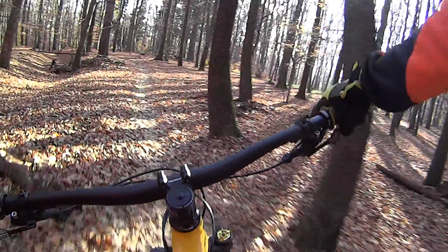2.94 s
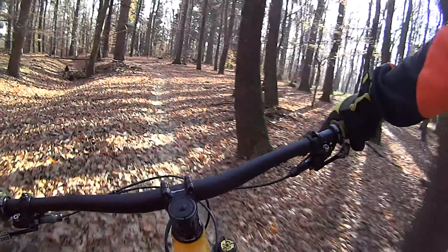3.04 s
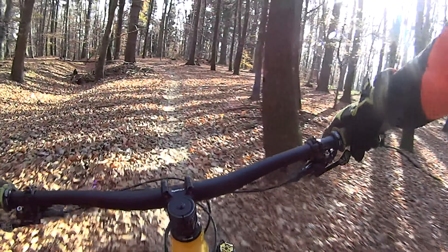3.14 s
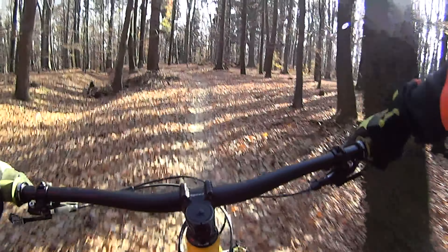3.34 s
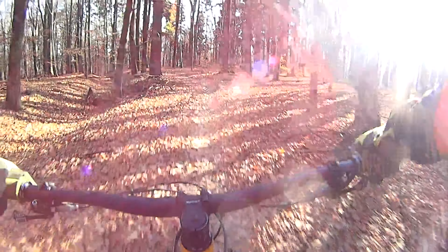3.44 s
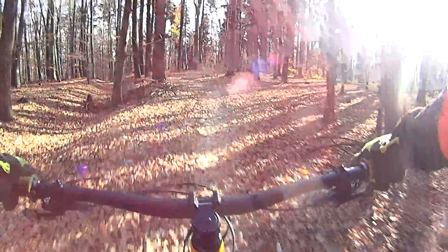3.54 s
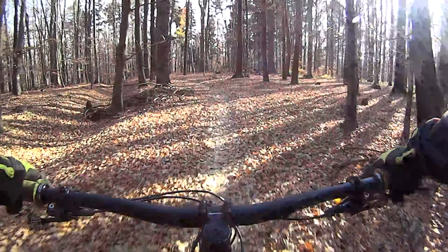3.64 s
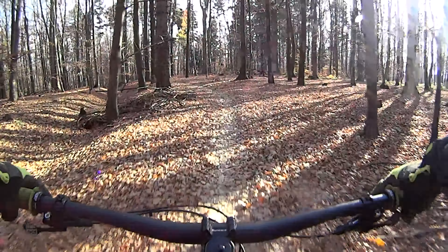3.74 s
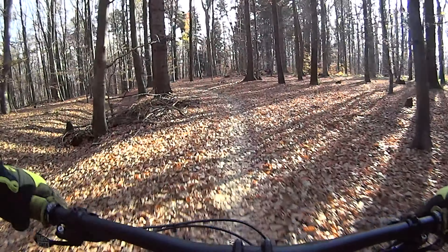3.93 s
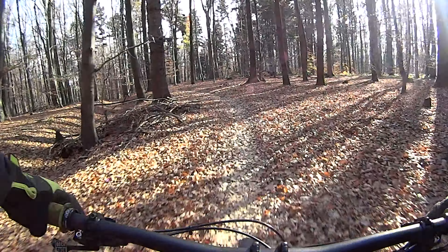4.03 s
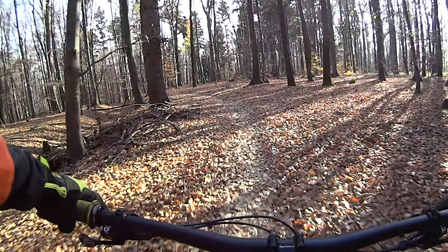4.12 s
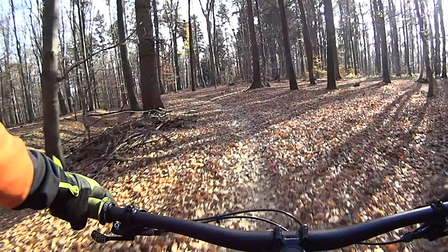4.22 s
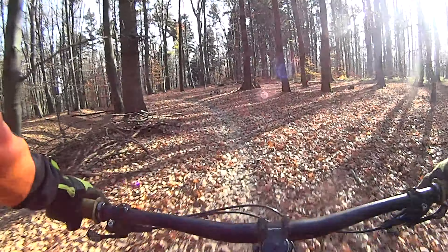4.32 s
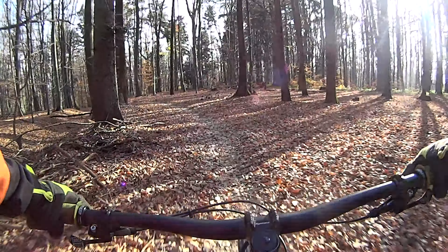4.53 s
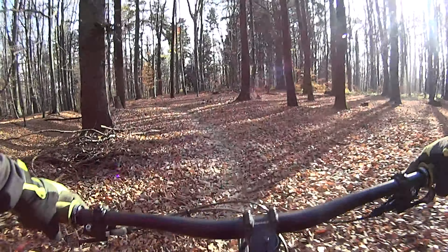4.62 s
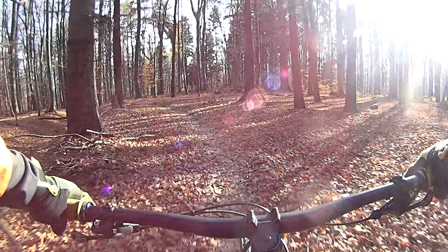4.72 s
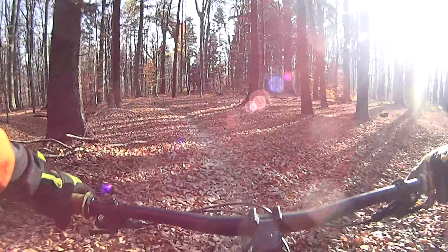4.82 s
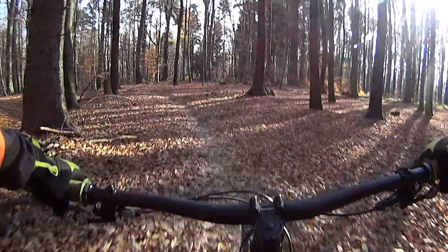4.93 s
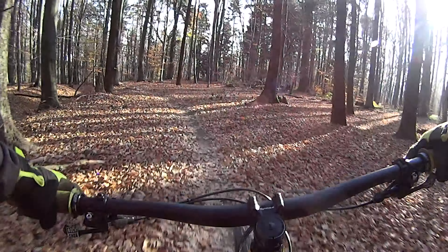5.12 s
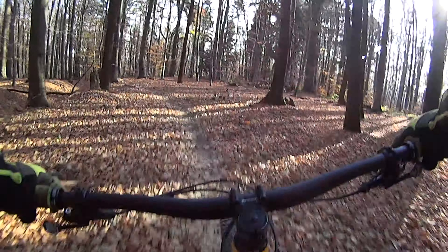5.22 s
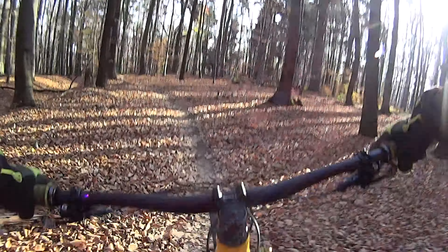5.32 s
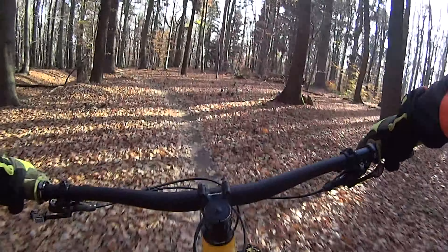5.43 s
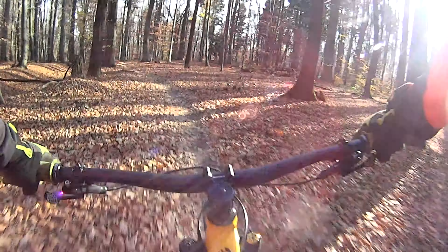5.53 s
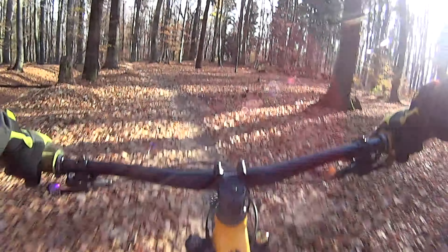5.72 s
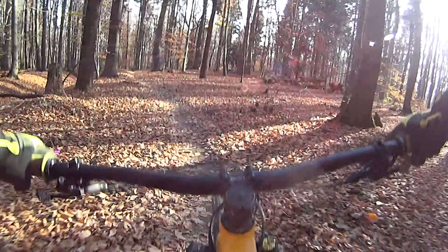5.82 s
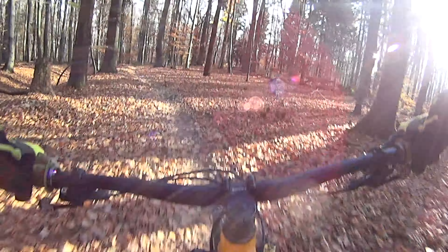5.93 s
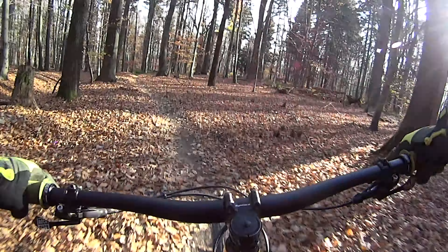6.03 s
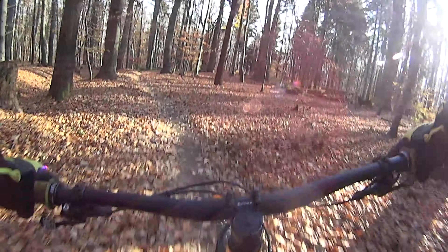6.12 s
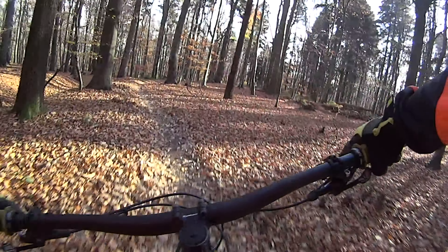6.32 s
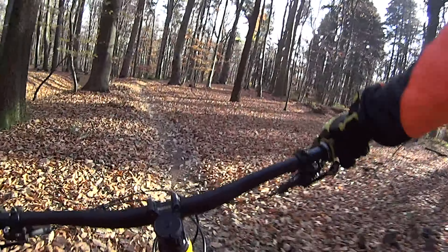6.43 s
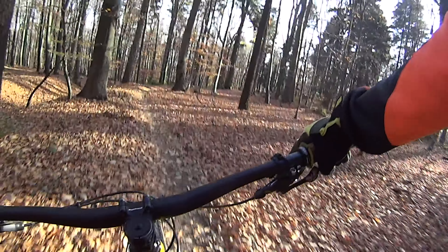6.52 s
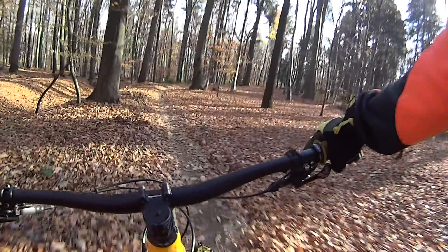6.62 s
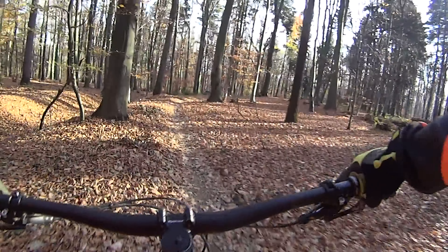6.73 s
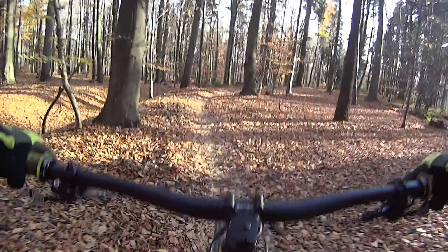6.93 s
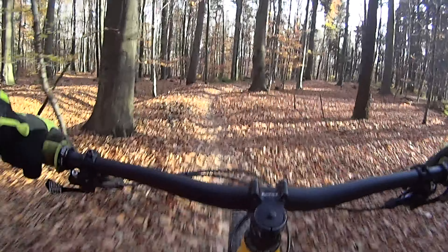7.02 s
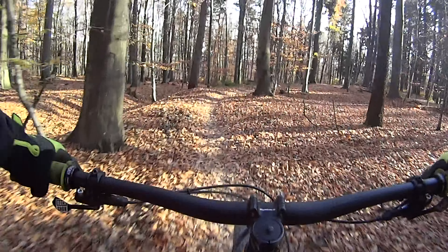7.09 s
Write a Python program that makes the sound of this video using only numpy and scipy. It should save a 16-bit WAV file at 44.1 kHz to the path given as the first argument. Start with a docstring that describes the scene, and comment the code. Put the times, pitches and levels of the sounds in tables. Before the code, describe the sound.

Close, crackling rustle of a bicycle rolling over dry leaves, dotted with twig snaps, rattles and thumps from bumps in the trail.

```python
"""Mountain bike in dry leaves

A forest trail, heard close up from a stereo camera on the rider's chest. The tyres crush leaves,
scrub over packed litter and snap twigs. Over roots the frame knocks, chain and cables rattle,
and the jolts thump through the camera mount. The ground gets rougher towards the end."""
import sys
import numpy as np
from scipy import signal
from scipy.fft import rfft, irfft
from scipy.io import wavfile
from scipy.ndimage import uniform_filter1d

SR = 44100
rng = np.random.default_rng(int(sys.argv[2]) if len(sys.argv) > 2 else 0)


def bounce(signal):
    """Save signal as a 16-bit WAV file at the path given by the first command-line argument."""
    frames = np.transpose(np.atleast_2d(signal))
    limited = np.clip(frames, -1, 1)
    pcm = np.round(limited * 32767).astype(np.int16)
    wavfile.write(sys.argv[1], SR, pcm)


N = 399546
TIME, BINS = np.arange(N) / SR, np.fft.rfftfreq(N, 1 / SR)

# roughness of the ground: t/s, tyre scrub level/dB, frame rumble level/dB
ROUGHNESS = [(0.0, -42, -52.5), (1.52, -41, -51.5), (2.5, -45, -57), (2.76, -39.5, -52.0),
             (3.12, -43.5, -54.0), (3.78, -40.5, -53.0), (3.92, -43.5, -53.5), (5.2, -41.5, -53.0),
             (5.44, -37.5, -46), (5.68, -38.5, -49.5), (6.38, -41, -53.5), (6.76, -36.5, -46.5),
             (7.24, -39.5, -52), (7.58, -40.0, -52.5), (7.72, -32, -42.5), (7.92, -33, -37.5),
             (8.33, -38.5, -54.5), (9.06, -32.5, -36.5)]
# spectrum of a breaking twig or stiff leaf: f/Hz, level/dB
SNAP_SPECTRUM = [(600, -27.5), (1900, -12), (2500, -4), (2900, -1.5), (3500, 3), (4100, -4.5), (5000, 3),
                 (5700, -7.5), (7500, -13.5), (11000, -28)]
# hard blows to the frame: t/s, level/dB, centre of the ring f/Hz
FRAME_BLOWS = [(0.358, -23, 1370), (0.631, -12.5, 1060), (0.985, -24, 1460), (1.695, -25, 1640),
               (2.703, -23.5, 1130), (3.753, -18.5, 1430), (5.369, -13, 1030), (5.55, -11, 1050),
               (5.861, -19, 1650), (6.048, -19.5, 1580), (6.503, -24.5, 990), (6.582, -22, 1470),
               (6.779, -15, 1450), (7.016, -22.5, 1390), (7.201, -23.5, 1390), (7.344, -26.5, 1500),
               (7.648, -15, 1350), (7.727, -11, 980), (7.735, -6.5, 1110), (7.765, -10.5, 1410),
               (7.788, -13.5, 1530), (8.153, -19.5, 1400), (8.592, -16.5, 1420), (8.906, -7, 990)]


def amp(db):
    """Decibels to gain."""
    return 10 ** (np.asarray(db) / 20)


def unit(x):
    """Scales to an rms of one."""
    return x / np.sqrt(np.mean(x ** 2) + 1e-20)


def over_hz(points):
    """Reads a curve at each bin, on a log-frequency axis."""
    hz, value = np.transpose(points)
    return np.interp(np.log(BINS + 1), np.log(hz + 1), value)


def over_time(rows):
    """Reads every column of a curve at each sample."""
    s, *columns = np.transpose(rows)
    return [np.interp(TIME, s, column) for column in columns]


def wander(lo_hz, hi_hz):
    """Random drift with equal power in each octave between two rates."""
    band = (BINS > lo_hz) * (BINS < hi_hz) / np.sqrt(BINS + lo_hz)
    return unit(irfft(rfft(rng.standard_normal(N)) * band, N))


def clicks(per_s, spread_db):
    """Three unrelated trains of tiny impacts, mostly small and a few large."""
    size = amp(spread_db * np.minimum(rng.exponential(1, (3, N)), 4.5))
    return unit(size * rng.choice([-1, 1], (3, N)) * (rng.random((3, N)) < per_s / SR))


def microphones(direct, scattered=None):
    """Direct sound reaches the two ports with a phase and level step; scattered sound differs at each."""
    # likeness of left and right: f/Hz, coherence/0-1
    likeness = [(60, .93), (160, .85), (330, 0.35), (520, 0.35), (700, 0.4), (1000, 0.6), (1400, 0.9),
                (1720, 0.9), (1900, 0.3), (2300, 0.95), (5100, 0.98), (5850, 0.65), (6450, 0.7),
                (7100, 0.45), (11000, 0.66)]
    # phase by which the left leads: f/Hz, phase/rad
    left_lead = [(210, 0), (310, 1.7), (420, 2.4), (600, 2.4), (820, .5), (1080, -.15), (1320, 0),
                 (2000, -1), (2500, -.55), (3080, -1.15), (3550, -.1), (5000, -.25), (8000, -.5),
                 (11000, -.15)]
    # left minus right: f/Hz, level/dB
    balance = [(100, -1), (500, 0), (850, -0.5), (1250, 4), (2000, 1), (2850, 3.5), (3250, -7), (3950, 5),
               (5800, 0.5), (6750, 2.5), (7200, 0.5), (11000, 0.5)]
    sides, lead = np.array([[0.5], [-0.5]]), over_hz(left_lead)
    coherence = np.clip(over_hz(likeness), 0, 1)
    pair = rfft(direct) * np.exp(1j * sides * lead)
    if scattered is not None:
        pair = np.sqrt(coherence) * pair + np.sqrt(1 - coherence) * rfft(scattered)
    mid_gain = np.sqrt(coherence * np.cos(lead / 2) ** 2 + (1 - coherence) / 2 + 1e-6)
    return irfft(pair * amp(sides * over_hz(balance)) / mid_gain, N)


def radiate(drive, spectrum):
    """Three streams ring a body and reach the microphones by one direct and two scattered paths."""
    log_gain = np.log(unit(amp(over_hz(spectrum))))
    cepstrum = irfft(log_gain, N) * (1 + np.sign(N / 2 - np.arange(N)))  # folded to make the body causal
    cepstrum[0] /= 2
    sound = irfft(rfft(drive) * np.exp(rfft(cepstrum)), N)
    return microphones(sound[0], sound[1:])


def ground_bounce(x, echo_db, delay_s=0.0057):
    """The ground below the bike returns a faint copy a few milliseconds later."""
    return x + amp(echo_db) * np.roll(x, round(delay_s * SR), axis=-1)


def flicker(x, patchy_db):
    """Leaves differ in size, so each clump rings in its own narrow bands for a moment."""
    spectra = signal.stft(x, SR, nperseg=512)[2]
    patches = rng.standard_normal(spectra.shape[1:])
    for axis in (0, 1):
        patches = uniform_filter1d(patches, size=4, axis=axis)
    return signal.istft(spectra * unit(amp(patchy_db * unit(patches))), SR)[1][:, :N]


def grip_db():
    """How firmly the tyres press on the ground: 0 dB until the bike goes light after a bump."""
    # hops: middle t/s, level change/dB, half length/s
    hops = [(7.782, -3, 0.029), (8.698, -6.5, 0.04), (8.968, -5, 0.016)]
    return sum(db * np.exp(-((TIME - s) / half) ** 4) for s, db, half in hops)


def cracks(rows, first_share):
    """Each break (t/s, level/dB, decay/s) is one sharp crack, then a dying cluster of fibre cracks."""
    power, first = np.zeros((2, N))
    age = np.arange(2048)
    for s, db, decay_s in rows:
        at = int(s * SR)
        fading = amp(db) ** 2 * np.exp(-age / (decay_s * SR))
        power[at:at + len(age)] += fading[:N - at]
        first[at] = np.sqrt(fading.sum())
    cluster = clicks(per_s=9000, spread_db=2.0) * np.sqrt(power)
    return np.sqrt(1 - first_share) * cluster + np.sqrt(first_share) * first * np.array([[1], [.5], [-.5]])


def stiff_leaves(per_s, db, decay_s):
    """Single stiff leaves stand out as they break: rows of t/s, level/dB, decay/s."""
    gap, size, length = rng.exponential(1, (1200, 3)).T
    s = np.cumsum(gap) / per_s
    rows = np.transpose([s, db + 2.0 * np.minimum(size, 3), decay_s * (0.82 + 0.46 * length)])
    return rows[s < N / SR]


def leaves():
    """Thousands of leaf cracks a second, in clumps, over the swish of leaves thrown aside."""
    # depth of leaves under the tyres: t/s, crush level/dB, relative fizz level/dB
    leaf_depth = [(0.0, -36, -10), (0.29, -38, -9.5), (0.84, -34.5, -11), (0.97, -37.5, -8.5),
                  (1.33, -36, -7.5), (1.54, -31.5, -9.5), (2.22, -32, -10), (2.38, -36, -8.5),
                  (2.72, -32.5, -8), (3.2, -36, -10), (3.38, -32.5, -9), (3.97, -32.5, -9),
                  (4.55, -35.5, -9.5), (5.21, -32.5, -10.5), (5.9, -34, -11), (6.5, -37, -9.5),
                  (6.86, -30.5, -8.5), (7.08, -32, -11), (7.86, -34.5, -8.5), (8.0, -27, -8),
                  (8.3, -25.5, -8), (8.6, -30.5, -10.5), (9.06, -30.5, -11.5)]
    # spectrum of crushed leaves: f/Hz, level/dB
    leaf_spectrum = [(500, -42.5), (1500, -18), (2100, -10.5), (2550, -7), (2850, 0), (3400, 0.5),
                     (4150, -4), (4600, -1), (5000, 1), (5600, -6), (6000, -8), (6450, -8.5), (8300, -12),
                     (11000, -24)]
    depth_db, fizz_db = over_time(leaf_depth)
    crush_db = depth_db + 0.48 * grip_db()
    # leaves lie unevenly: heaps, clumps inside them, then quick crumpling
    uneven_db = 0.79 * wander(3, 9) + wander(6.3, 40) + 1.18 * wander(40, 300)
    crackle = amp(-3.0) * clicks(per_s=7000, spread_db=2.5)
    swish = amp(-5.5) * rng.standard_normal((3, N))
    crush = radiate((crackle + swish) * amp(crush_db + uneven_db), leaf_spectrum)
    highpass = 1 / (1 + (6000 / (BINS + 1)) ** 12)
    fizz = irfft(rfft(crush) * highpass, N)  # thin leaves alone reach the top octave
    breaks = cracks(stiff_leaves(per_s=56, db=-5.0, decay_s=0.001), first_share=0.28)
    crunch = radiate(breaks * amp(crush_db), SNAP_SPECTRUM)
    return flicker(crush - fizz + fizz * amp(fizz_db + 12.0) + crunch, patchy_db=2.0)


def tyres():
    """Knobs scrub over the packed litter while the frame rumbles on uneven ground."""
    # spectrum of the scrubbing knobs: f/Hz, level/dB
    scrub_spectrum = [(150, -17.5), (300, -12), (490, -13), (640, -13), (850, -7), (1030, -2), (1240, -1.5),
                      (1310, 1), (1400, 5.5), (1480, -1.5), (1700, -2.5), (1900, -14.5), (2400, -0.5),
                      (5000, -24.5)]
    # spectrum of the rumbling frame: f/Hz, level/dB
    rumble_spectrum = [(10, -2.5), (25, 6), (55, -3.5), (105, 0), (150, -2.5), (250, -7), (400, -15),
                       (700, -29), (2000, -65)]
    scrub_db, rumble_db = over_time(ROUGHNESS)
    scrub = clicks(per_s=1800, spread_db=2.0) * amp(scrub_db + grip_db() + 1.2 + 0.69 * wander(5.2, 58))
    rumble = rng.standard_normal((3, N)) * amp(rumble_db + grip_db() + 1.7 + 1.9 * wander(5.4, 40))
    scrub = ground_bounce(radiate(scrub, scrub_spectrum), echo_db=-22.5)
    return flicker(scrub + radiate(rumble, rumble_spectrum), patchy_db=2.5)


def twigs():
    """Twigs break under the tyres with a short, splintering snap."""
    # breaking twigs: t/s, level/dB, decay/s
    snaps = [(0.1117, -26, 0.008), (0.2352, -31, 0.0069), (0.5715, -34, 0.0062), (0.5936, -28.0, 0.004),
             (0.6492, -30.5, 0.0067), (0.7804, -26, 0.0076), (1.2545, -30, 0.0076), (1.5878, -25.5, 0.0087),
             (1.7403, -25.5, 0.0034), (2.2205, -31.5, 0.008), (2.5205, -28, 0.0036), (3.266, -28, 0.0036),
             (3.6596, -25, 0.0025), (3.7677, -27.5, 0.0041), (5.3696, -27.5, 0.0042), (5.494, -16, 0.0016),
             (5.8613, -22, 0.0027), (5.9834, -24.5, 0.0044), (6.0246, -24, 0.002), (6.7695, -26.5, 0.0032),
             (7.6949, -25, 0.009), (8.2479, -19.5, 0.0053), (8.5702, -18.5, 0.0034), (8.6598, -19, 0.0015),
             (8.7478, -22.5, 0.0037)]
    return amp(1.5) * radiate(cracks(snaps, first_share=0.24), SNAP_SPECTRUM)


def cable_taps(per_s, above_db, centre_hz):
    """Small bumps make the cables tap the frame, louder on rough ground: rows of t/s, level/dB, f/Hz."""
    gap, size, place = rng.exponential(1, (200, 3)).T
    s = np.cumsum(gap) / per_s
    scrub_db = np.interp(s, TIME, over_time(ROUGHNESS)[0])
    db = scrub_db + above_db + 2.4 * np.minimum(size, 2)
    hz = centre_hz * 2 ** (0.15 * (1 - np.minimum(place, 2)))
    return np.transpose([s, db, hz])[(s > 0.01) & (s < N / SR)]


def frame_knocks():
    """Single blows ring the damped frame; the place of the blow favours the modes near one pitch."""
    # modes of the frame: f/Hz, level/dB, t60/s
    frame_modes = [(159, -9.5, 0.032), (340, -1, 0.015), (502, -4.5, 0.047), (670, -3.5, 0.029),
                   (897, -5.5, 0.023), (1053, 4, 0.0096), (1260, 7.5, 0.0072), (1433, -3.5, 0.029),
                   (1640, -1, 0.02), (2440, 2.5, 0.014), (4900, -9, .004)]
    out, t = np.zeros(N), np.arange(2048) / SR
    contact = 1 - np.exp(-t / 0.00046)  # rubber and plastic soften the onset
    for s, db, centre_hz in [*FRAME_BLOWS, *cable_taps(per_s=8, above_db=7.0, centre_hz=1440)]:
        ring = np.zeros(len(t))
        for k, (hz, mode_db, t60) in enumerate(frame_modes):
            off_centre_db = -18.9 * min(abs(np.log2(hz / centre_hz)), 1)
            envelope = contact * amp(mode_db + off_centre_db - 60 * t / t60)
            ring += (-1) ** k * envelope * np.sin(2 * np.pi * hz * t)
        part = out[round(s * SR):][:len(t)]
        part += (amp(db) * ring / abs(ring).max())[:len(part)]
    return amp(1.3) * ground_bounce(microphones(out), echo_db=-14)


def chain_rattle():
    """Links and cables chatter against the frame in short bursts as the bike hits bumps."""
    # bursts of rattling: peak t/s, level/dB, decay/s
    rattles = [(0.362, -27.5, 0.0068), (0.988, -30.5, 0.004), (1.696, -36.5, 0.011), (2.683, -35, 0.006),
               (2.738, -37, 0.0065), (3.759, -27.5, 0.0079), (4.912, -36, 0.007), (5.631, -26, 0.0091),
               (5.712, -30.5, 0.012), (5.856, -28.5, 0.011), (5.927, -30, 0.0067), (6.418, -35.5, 0.01),
               (6.836, -29.5, 0.005), (7.657, -28.5, 0.01), (7.758, -24, 0.012), (7.877, -26.5, 0.019),
               (7.945, -31, 0.0054), (7.98, -24.5, 0.0097), (8.006, -20, 0.0044), (8.575, -26, 0.0041),
               (8.596, -21.5, 0.012), (8.893, -28, 0.022), (9.017, -18.5, 0.0068)]
    # spectrum of chain and cables: f/Hz, level/dB
    chain_spectrum = [(100, -21.5), (400, -18), (650, -14), (800, -3.5), (1100, -1), (1400, 2), (1700, 1),
                      (1950, -8.5), (2400, -3.5), (2900, -8), (3800, -39), (8000, -46)]
    power = np.zeros(N)
    for s, db, decay_s in rattles:
        near = slice(max(int((s - 0.1) * SR), 0), int((s + 0.2) * SR))
        age = (TIME[near] - s) / decay_s
        power[near] += amp(db) ** 2 * np.exp(np.minimum(age / 0.96, -age))  # swells, then dies away
    chatter = clicks(per_s=1800, spread_db=3.5) * np.sqrt(power)
    return amp(1.5) * ground_bounce(radiate(chatter, chain_spectrum), echo_db=-19.0)


def mount_thumps():
    """A jolt rocks the soft camera mount for a cycle or two, and sways it a little to either side."""
    # the wheels drop off roots: middle t/s, level/dB, f/Hz
    root_drops = [(5.707, -27, 90), (5.926, -28, 79.6), (6.652, -31, 89), (6.82, -23, 75),
                  (6.835, -24, 115), (7.728, -21, 65), (7.816, -13.5, 83), (7.898, -20, 115),
                  (7.992, -23.5, 99), (8.072, -19.5, 90), (8.636, -24.5, 91), (8.879, -18, 85),
                  (8.931, -14, 96)]
    # each hard blow to the frame also shakes the mount, the more the deeper it rings
    lag_s, shake_hz = 0.0074, 122
    shakes = [(s + lag_s, db - 16.5 - 19 * np.log2(hz / 1050), shake_hz) for s, db, hz in FRAME_BLOWS]
    rock, sway = np.zeros((2, N))
    for s, db, hz in [*root_drops, *shakes]:
        near = slice(int((s - 0.05) * SR), int((s + 0.05) * SR))
        cycles = (TIME[near] - s) * hz
        swing = amp(db) * np.exp(2j * np.pi * cycles - (cycles / 0.61) ** 2)
        rock[near] += swing.real
        sway[near] += swing.imag * rng.choice([-1, 1])
    return amp(-3.5) * (microphones(rock) + amp(-11.5) * sway * np.array([[1], [-1]]))


def scene():
    """The whole bike from chest height, in open forest with no reverberation."""
    return leaves() + twigs() + tyres() + chain_rattle() + frame_knocks() + mount_thumps()


def record(dry):
    """The camera housing colours the sound mildly, and the top of the treble is cut off steeply."""
    # resonances and notches of the housing: f/Hz, width/Hz, level/dB
    housing = [(471, 28, 2), (717, 51, -4.5), (751, 21, 6), (1710, 37, 2), (2400, 79, 2.5), (2440, 150, -1),
               (2773, 160, 3), (5080, 310, 1.4), (5800, 400, -1.5), (6430, 230, 3), (9780, 540, 3.5)]
    housing_db = sum(db / (1 + (2 * (BINS - hz) / width) ** 2) for hz, width, db in housing)
    housed = irfft(rfft(dry) * amp(housing_db), N)
    lowpass = signal.firwin(601, cutoff=11150, window=("kaiser", 8), fs=SR)
    return signal.oaconvolve(housed, lowpass[None], "same")


dry = scene()
out = record(dry)
bounce(out)
```